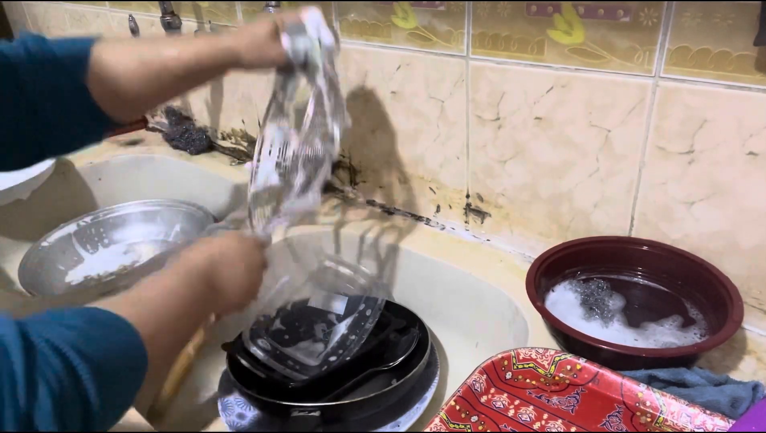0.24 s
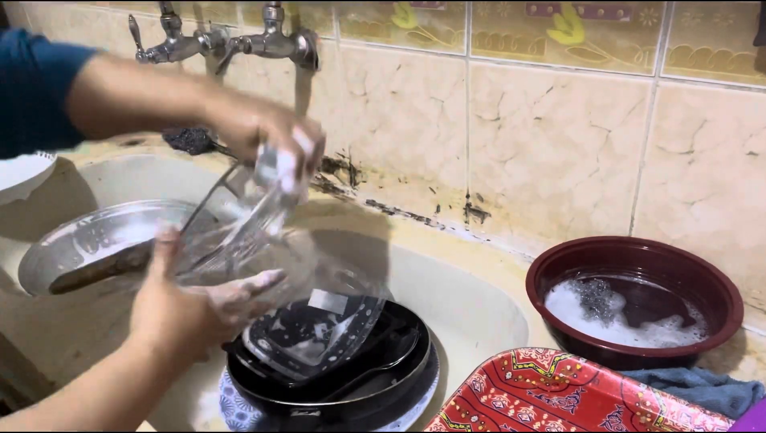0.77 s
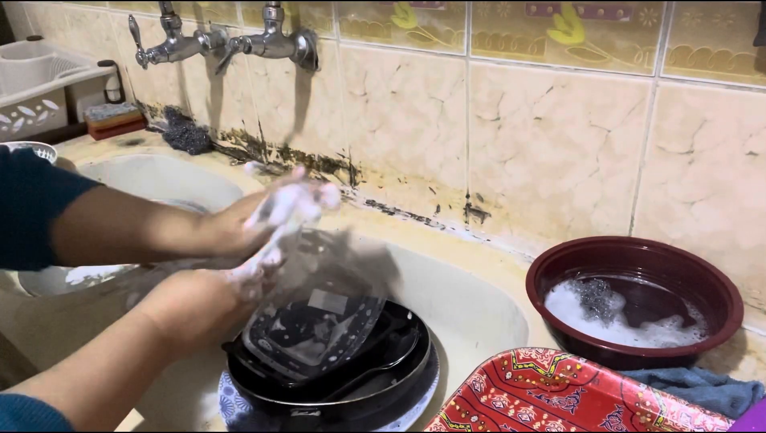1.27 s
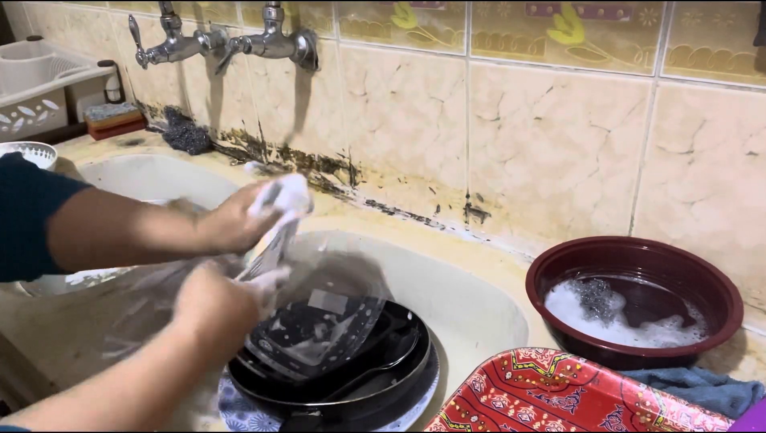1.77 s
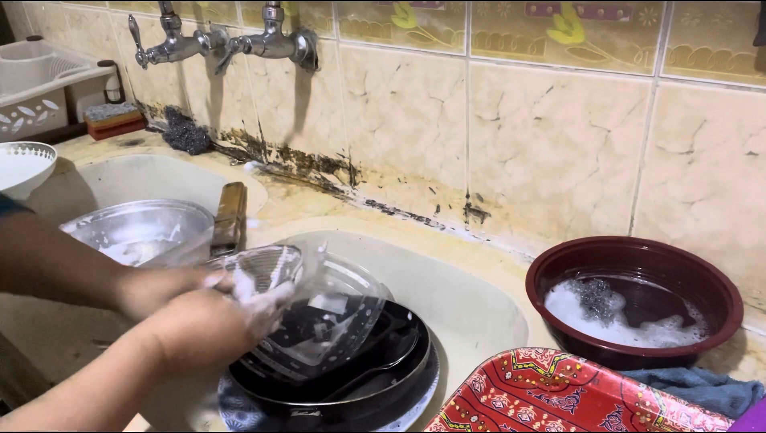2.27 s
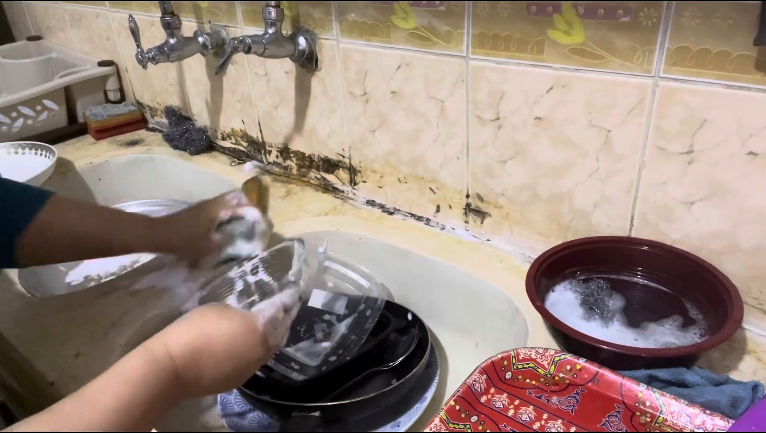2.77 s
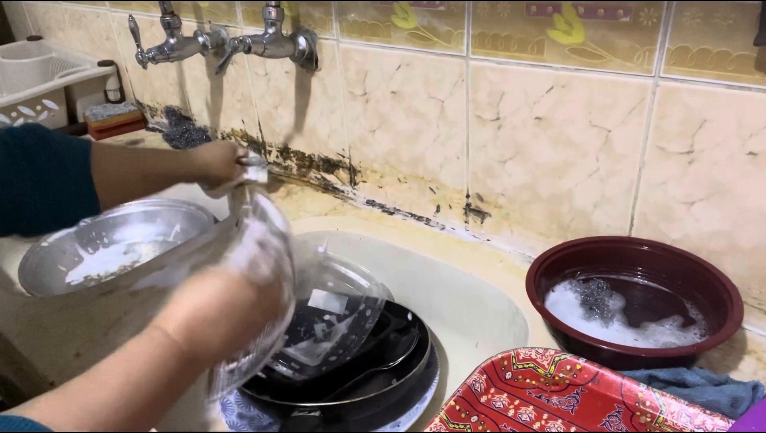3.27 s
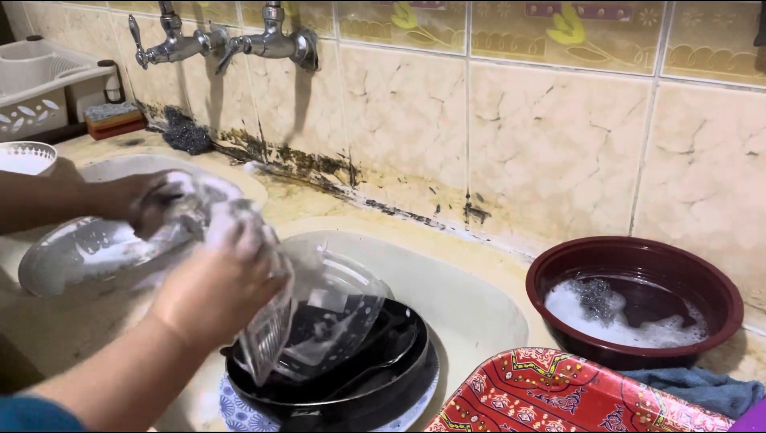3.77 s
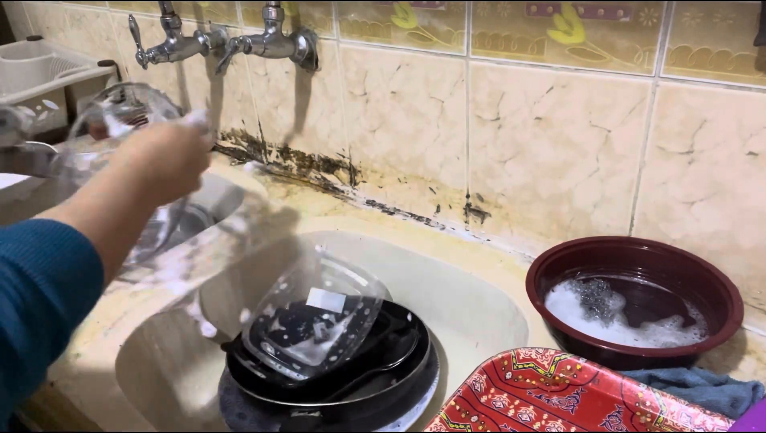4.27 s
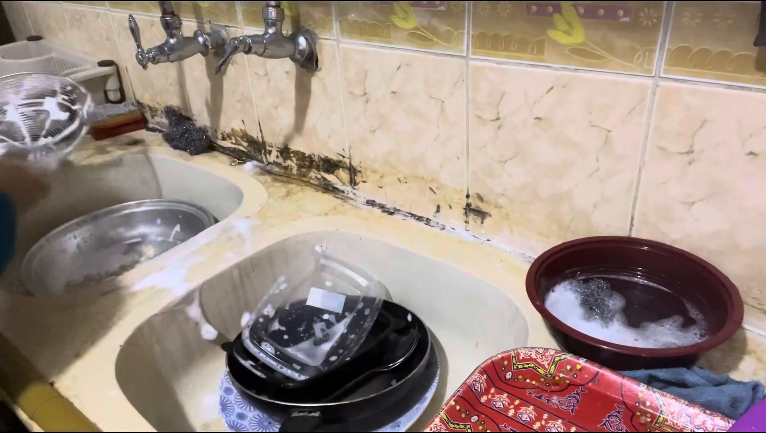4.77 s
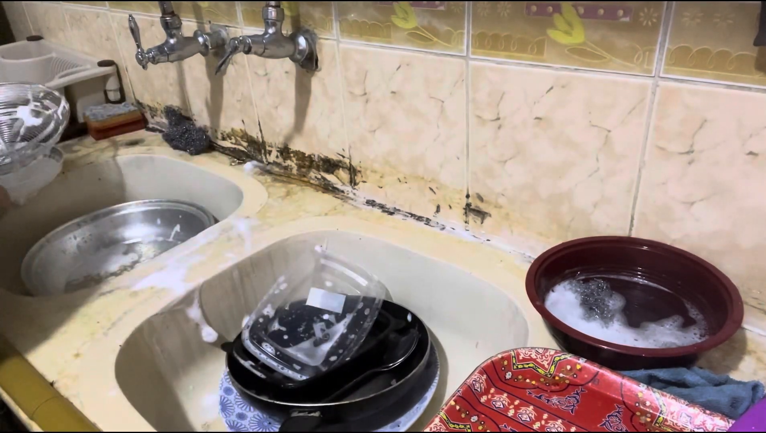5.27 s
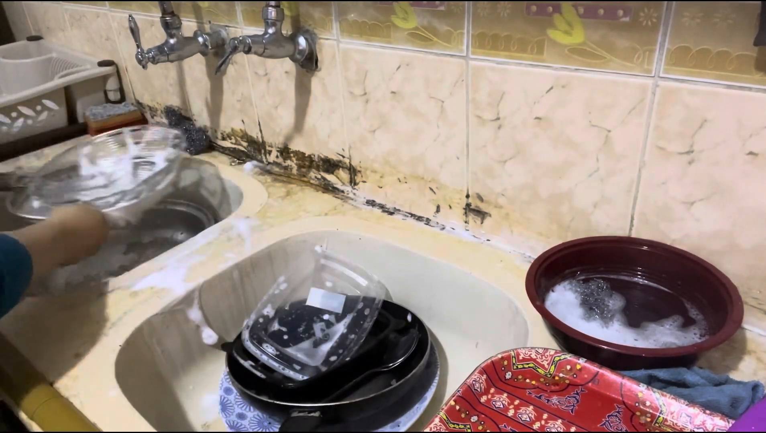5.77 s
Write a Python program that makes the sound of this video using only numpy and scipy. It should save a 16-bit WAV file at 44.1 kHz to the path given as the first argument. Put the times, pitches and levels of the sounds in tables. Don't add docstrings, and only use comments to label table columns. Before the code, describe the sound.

Hands scrub a soapy strainer in a small, hard, echoing kitchen. It starts nearly silent, then uneven knocks on plastic and wire mesh come in bursts, with gritty sponge strokes, sudsy hiss, low sink thuds and chattering dishes between them. Things fall quiet, leaving the low hum; then a faint hollow metal rub, small rim clinks and a final thin metallic clang, all heard close in stereo.

```python
import sys
import numpy as np
from scipy import signal
from scipy.fft import rfft, irfft, next_fast_len
from scipy.io import wavfile

SR = 44100
rng = np.random.default_rng(int(sys.argv[2]) if len(sys.argv) > 2 else 0)


def unload_wav(signal):
    wavfile.write(
        sys.argv[1],
        SR,
        np.round(np.clip(np.atleast_2d(signal).T, -1, 1) * 32767).astype(np.int16),
    )


def boost_factor(decibels):
    exponent = np.asarray(decibels, float) / 20
    return 10 ** exponent


N = 265482

# (frequency [Hz], level [dB per Hz])
HUM_SPECTRUM = [(15, -57), (25, -14.5), (80, 4.5), (123, -4), (190, -31.5), (223, -13), (242, -14),
                (285, -16.5), (463, -34.5), (531, -31), (796, -32.5), (887, -30.5), (1160, -50.5),
                (1260, -40), (16000, -66)]
HUM_DB = -44.5
# (time [s], level [dB])
RUMBLE = [(0.0, -52), (0.2, -48), (0.64, -53), (1.3, -49), (3.5, -52), (3.75, -47), (4.36, -54), (5.0, -52),
          (5.4, -50), (6.02, -54)]
SHAKE_DB, SHAKE_RISE_S, SHAKE_FALL_S = -19, .03, .18
SHAKE_DB_PER_OCTAVE = -10

# (time [s], body peak [dB], ring [Hz], click [dB])
TAPS = [(0.089, -54.5, 624, -54), (0.876, -39, 720, -43), (0.9654, -32, 1190, -55.5),
        (1.009, -51, 680, -48), (1.146, -26.5, 776, -40), (1.351, -25.5, 753, -40.5),
        (1.456, -38, 660, -52), (1.541, -27, 570, -46), (1.617, -22, 700, -41), (2.109, -64, 700, -38),
        (2.145, -31, 680, -38), (2.965, -21.5, 1420, -45), (2.988, -23, 1240, -45),
        (3.339, -33, 1190, -44.5), (3.376, -30.5, 680, -54), (3.434, -37, 633, -36),
        (3.456, -33.5, 1312, -47), (3.48, -32.5, 1390, -48), (3.972, -59, 830, -75), (4.228, -52, 552, -57),
        (4.978, -48, 862, -74)]
# (time [s], body peak [dB], ring [Hz], click [dB], crack [dB])
BLOWS = [(0.722, -13.5, 680, -28, -22.5), (1.762, -19.5, 1650, -18, -18), (1.794, -7.5, 1080, -16, -24),
         (1.9428, -15.5, 1390, -22, -33), (2.5145, -35, 2140, -30, -30.5), (2.536, -8, 1330, -9, -30),
         (2.559, -20.5, 700, -20.5, -42.5), (2.649, -28, 594, -39, -30), (2.721, -28, 580, -24, -35),
         (3.098, -21.5, 1240, -22, -24.5), (3.238, -17, 1730, -14, -19), (3.259, -22, 1730, -27, -35),
         (3.687, -8.5, 700, -13, -13), (3.699, -12, 1090, -13, -14.5), (3.721, -17, 887, -22, -25),
         (3.7385, -26, 800, -24, -24), (3.749, -21, 786, -18, -17)]
# (time [s], body peak [dB], ring [Hz], click [dB])
SKIDS = [(0.769, -22.5, 700, -47), (1.489, -31, 616, -37), (1.738, -54, 640, -31.5),
         (2.2021, -32, 1355, -42.5), (2.344, -33.5, 684, -42), (2.777, -29.5, 593, -38),
         (2.946, -33, 590, -46)]
BLOW_RATTLE_S, TAP_RATTLE_S, SKID_RATTLE_S = .009, .013, .035
TAP_CRACK_DB, SKID_CRACK_DB = -13, -9
BOUNCE_WITHIN_S, BOUNCE_RATTLE_S = .04, .017
# (frequency [Hz], width [Hz], level [dB])
TUB_MODES = [(713, 30, -15), (853, 166, 19.5), (1150, 130, 25.5), (1190, 76, 7), (1390, 57, 2.5),
             (1650, 100, 11), (1950, 50, -3)]
# (frequency [Hz], width [Hz], level [dB])
MESH_MODES = [(2450, 300, -2), (2900, 300, -2), (3350, 280, 0), (3800, 350, -3), (4400, 400, -4),
              (5300, 500, -5)]
# (frequency [Hz], level [dB per Hz])
CRACK_SPECTRUM = [(1180, -35), (2000, -5), (2400, 12.5), (3430, 15), (5210, 9.5), (6940, 18.5), (8400, 3.5),
                  (12300, 14.5), (16000, -18)]
# (until [s], frequency [Hz], T60 [s], share [1])
DISH_UNDER = [
    (1.7, 665, .12, .35),
    (3.6, 1340, .16, .25),
    (6.1, 800, .12, .15),
]

# (time of peak [s], rasp [dB], rise by 10 dB [s], fall by 10 dB [s])
STROKES = [(0.16, -63.5, .05, .04), (0.47, -64, .2, .15), (0.63, -64, .15, .04), (0.77, -54, .02, .15),
           (1.04, -58, .04, .04), (1.1, -54, .04, .1), (1.27, -50, .12, .03), (1.4, -53, .07, .03),
           (1.53, -47, .07, .055), (1.72, -59, .1, .03), (1.84, -46, .03, .13), (1.97, -50, .03, .12),
           (2.12, -52, .04, .06), (2.25, -49, .09, .15), (2.37, -50, .1, .07), (2.655, -45, .07, .04),
           (2.81, -49, .1, .07), (2.97, -50, .06, .05), (3.09, -54, .05, .05), (3.28, -47, .03, .07),
           (3.46, -48, .05, .11), (4.17, -65.5, .4, .15), (4.62, -71, .12, .12), (4.95, -76, .15, .09)]
# (time [s], level [dB])
EFFORT = [(0.0, -58), (0.6, -56.5), (0.89, -49), (1.22, -47), (1.36, -49), (1.68, -42), (1.83, -43),
          (1.94, -39), (2.05, -45), (2.31, -41), (2.47, -48), (2.6, -42), (2.9, -48), (3.02, -42),
          (3.2, -47), (3.36, -42), (3.62, -54), (4.2, -59.5)]
# (frequency [Hz], level [dB per Hz])
RASP_SPECTRUM = [(100, -3.5), (140, 3), (300, -3.5), (500, 0.5), (800, 1.5), (1400, -5), (3200, -7),
                 (5000, -5.5), (8000, -13), (12500, -21.5), (16000, -19)]
RUB_DB, RUB_FOLLOWS, RUB_BY_STROKE_DB = -61, 1.4, -3
WET_DB, WET_FOLLOWS = -76, 1.25
FIZZ_DB = -6
SPRAY_DB, SPRAY_FALL_S = -25, .075
DISH_HUM_DB = -10
# (time [s], level [dB], rise by 10 dB [s], fall by 10 dB [s])
SQUIRTS = [(0.73, -53, .004, .06), (1.76, -46, .016, .03), (1.8, -51, .01, .05), (2.3, -60, .06, .06),
           (2.54, -50, .003, .03), (2.653, -50, .004, .012), (3.7, -46, .008, .05), (5.503, -56, .003, .03),
           (5.7, -56, .003, .02)]

# (time [s], peak [dB], pitch [Hz], rattle [s])
THUDS = [(0.723, -18, 203, 0.023), (0.768, -24, 197, 0.037), (1.252, -29, 390, 0.023),
         (1.355, -33.5, 226, 0.012), (1.489, -30, 356, 0.012), (1.545, -24.5, 385, 0.0064),
         (1.616, -28, 396, 0.045), (1.794, -12.5, 424, 0.019), (1.945, -24, 270, 0.032),
         (2.149, -29.5, 344, 0.017), (2.203, -27, 430, 0.045), (2.342, -34, 450, 0.011),
         (2.537, -15.5, 410, 0.023), (2.648, -31, 434, 0.016), (2.727, -23.5, 186, 0.028),
         (2.78, -28.5, 152, 0.033), (2.949, -26.5, 214, 0.036), (2.989, -29, 200, 0.0085),
         (3.105, -26, 149, 0.023), (3.264, -27, 209, 0.019), (3.336, -29, 420, 0.03),
         (3.375, -21, 280, 0.012), (3.4, -20.5, 400, 0.016), (3.475, -27.5, 272, 0.021),
         (3.683, -33, 549, 0.0077), (3.71, -34, 514, 0.03), (3.782, -25, 355, 0.03),
         (3.858, -26, 215, 0.026)]
# (frequency [Hz], width [Hz], level [dB])
SINK_MODES = [(139, 60, 0), (186.5, 74, -1.5), (280, 36, -1), (355, 44, 1), (412, 44, 0), (518, 45, -9)]

# (time [s], level [dB], centre [Hz], rise by 10 dB [s], fall by 10 dB [s])
RATTLES = [(0.74, -44, 1200, .008, .05), (1.757, -36, 3500, .012, .015), (1.82, -38, 1300, .01, .06),
           (1.97, -37, 780, .01, .06), (2.56, -40, 3000, .01, .05), (2.61, -43, 2800, .03, .05),
           (2.75, -42, 750, .015, .06), (2.97, -44, 1800, .02, .04), (3.11, -42, 1800, .01, .04),
           (3.265, -38, 2300, .01, .06), (3.33, -44, 1600, .03, .04), (3.48, -48, 1500, .04, .05),
           (3.72, -39, 1000, .02, .05), (3.79, -40, 900, .03, .07), (5.93, -40, 1000, .015, .05)]
RATTLE_PER_S, RATTLE_CYCLES, RATTLE_OCTAVES = 600, 11.0, .55

# (time [s], hollow rub [dB], rim squeak [dB])
NUDGE = [
    (5.1, -77.5, -101.5),
    (5.13, -60.5, -90),
    (5.18, -56.5, -80),
    (5.215, -42, -64),
    (5.25, -54.5, -83),
    (5.33, -64.5, -89.5),
    (5.4, -99, -99),
]
# (time [s], level [dB], rise by 10 dB [s], fall by 10 dB [s])
WHINE = [(5.125, -77, .012, .05), (5.175, -73, .04, .02)]
SQUEAK_HZ, SQUEAK_T60_S = 4210, .2
# (frequency [Hz], width [Hz], level [dB])
BASIN_HOLLOW_MODES = [(280, 8.6, -4), (497, 35, -9), (574, 48, -9), (650, 59, -7.5), (860, 52, -3.5),
                      (999, 15, -12.5), (1205, 14, -16.5)]
# (frequency [Hz], width [Hz], level [dB])
RIM_MODES = [(2740, 47, -7), (4230, 31, 0), (4500, 40, -4), (6160, 60, -7), (8600, 53, -15),
             (11400, 120, -16)]

# (time [s], peak [dB], thud [dB], crack [dB], contact [s])
CLINKS = [
    (5.4992, -31, -50, -25.5, 0.013),
    (5.6113, -39, -66, -27, 0.0042),
    (5.698, -41, -54, -28.5, 0.0039),
    (5.902, -11.5, -29, -13, 0.0054),
]
# (frequency [Hz], width [Hz], level [dB])
RIM_TAP_MODES = [(1300, 90, -9), (1700, 50, 0), (1895, 70, -5), (2230, 70, -11), (2750, 40, -5),
                 (3650, 80, -6), (4740, 60, -4), (5570, 55, 0), (6750, 70, -6), (7200, 80, -10),
                 (7650, 70, -10), (8430, 50, -8), (9310, 40, -7), (11400, 80, -7)]
# (frequency [Hz], width [Hz], level [dB])
CLANG_MODES = [(1400, 60, -12), (1630, 90, -3), (2120, 45, 0), (2200, 110, -3), (2830, 45, -6),
               (3750, 110, -5), (4200, 60, -4), (4750, 70, -10), (5580, 70, -4), (5910, 60, -9),
               (6700, 50, -14), (8400, 90, -13), (9320, 80, -11), (11450, 100, -14)]

# (frequency [Hz], T60 [s])
ROOM_T60 = [(150, 0.31), (1000, 0.58), (4000, 0.41), (14000, 0.14)]
ROOM_DB, SCATTER_S = -2.5, .025
ROOM_SHIFT_S = .3
# (frequency [Hz], diffuse part [dB], quarter-cycle lead [1], extra lead of sharp blows [1], lean to the left [1])
PORTS = [(60, -18, .01, .01, -.02), (130, -15, .01, .01, -.04), (250, -11, .01, .01, .02),
         (600, -2, -.1, .01, .01), (1200, -5, -.1, .01, .01), (2500, -3, .1, .01, -.15),
         (4500, 1, .3, .01, -.2), (5500, -.5, .8, .01, -.3), (6900, -3, 1.2, .01, .5),
         (7900, -8, .1, .65, .05), (15000, -8, .1, .7, -.02)]


def rms_one(x):
    return x / np.sqrt(np.mean(x ** 2) + 1e-20)


def peak_one(x):
    return x / (np.abs(x).max() + 1e-20)


def in_time(rows):
    s, *columns = np.transpose(rows)
    return [np.interp(np.arange(N) / SR, s, c) for c in columns]


def at_hz(points, hz):
    points = np.array(points)
    return np.interp(np.log(hz), np.log(points[:, 0]), points[:, 1])


def swells(rows):
    t = np.arange(0, N + 64, 64) / SR
    s, db, rise, fall = np.transpose(rows)[:, :, None]
    power = boost_factor(2 * db - 20 * np.maximum((s - t) / rise, (t - s) / fall)).sum(axis=0)
    return np.interp(np.arange(N) / SR, t, 10 * np.log10(power + 1e-20))


def drift(rate):
    r = np.exp(-80 * np.pi * rate / SR)
    white = rng.standard_normal(N // 40 + 2002)
    slow = rms_one(signal.lfilter([1], [1, -2 * r, r * r], white)[2000:])
    return np.interp(np.arange(N) / 40, np.arange(len(slow)), slow)


def ring(x, hz, t60):
    r = boost_factor(-60 / (max(t60, .002) * SR))
    w = 2 * np.pi * hz / SR
    return signal.lfilter([0, np.sin(w)], [1, -2 * r * np.cos(w), r * r], x + 1e-18)


def band(x, low, high):
    return signal.sosfilt(signal.butter(2, [low, high], "band", fs=SR, output="sos"), x)


def colour(x, spectrum, low, high):
    hz = np.maximum(np.arange(1025) * SR / 2048, 20)
    gain = boost_factor(at_hz(spectrum, hz)) / np.sqrt((1 + (low / hz) ** 6) * (1 + (hz / high) ** 6))
    cepstrum = irfft(np.log(gain + 1e-9))
    cepstrum[1:1024] *= 2
    cepstrum[1025:] = 0
    return signal.fftconvolve(x, irfft(np.exp(rfft(cepstrum))))[:len(x)]


def add(out, sound, s):
    i = round(s * SR)
    out[i:i + len(sound)] += sound[:len(out) - i]


def contact(rattle_s, grit):
    t = np.arange(SR // 3) / SR
    chatter = rng.standard_normal(len(t)) * rng.exponential(1, len(t)) * np.exp(-t / max(rattle_s, .0005))
    chatter *= grit
    chatter[0] = 1
    return chatter


def body(force, peaks, spread_db, damping):
    luck = rng.normal(0, 1, len(peaks))
    return sum(boost_factor(level_db + spread_db * k) * ring(force, hz, 3.2 / (width * damping))
               for (hz, width, level_db), k in zip(peaks, luck))


def household():
    edges = 40 * 2 ** np.arange(0, 8.8, 1 / 3)
    white = rng.standard_normal((2, 2, N))
    shaken = swells([(s, db + SHAKE_DB + SHAKE_DB_PER_OCTAVE * np.log2(hz / 200), SHAKE_RISE_S, SHAKE_FALL_S)
                     for s, db, hz, _ in THUDS])
    stir_db = 10 * np.log10(boost_factor(2 * in_time(RUMBLE)[0]) + boost_factor(2 * shaken))
    stir_db = stir_db - np.median(stir_db) - 2.0
    out = 0
    for k, (low, high) in enumerate(zip(edges, edges[1:])):
        hz = np.sqrt(low * high)
        out = out + boost_factor(at_hz(HUM_SPECTRUM, hz) + stir_db * (hz < 120)) * band(white[k % 2], low, high)
    return boost_factor(HUM_DB) * rms_one(out)


def contacts():
    gaps = np.diff([0] + [row[0] for row in BLOWS])
    blows = [(*row, BOUNCE_RATTLE_S if gap < BOUNCE_WITHIN_S else BLOW_RATTLE_S)
             for row, gap in zip(BLOWS, gaps)]
    taps = [(*row, row[3] + TAP_CRACK_DB, TAP_RATTLE_S) for row in TAPS]
    skids = [(*row, row[3] + SKID_CRACK_DB, SKID_RATTLE_S) for row in SKIDS]
    return blows + taps + skids


def knocks():
    out = np.zeros(N)
    for s, body_db, ring_hz, click_db, crack_db, rattle_s in contacts():
        force = contact(rattle_s, grit=.048)
        hollow = peak_one(ring(force, ring_hz, 18.0 / ring_hz))
        hollow += 0.72 * peak_one(body(force, TUB_MODES, 6.6, 1.66))
        hollow += 0.6 * peak_one(band(force, 450, 2000))
        under_hz, t60, share = next(row[1:] for row in DISH_UNDER if s < row[0])
        dish = ring(force, under_hz, t60) + ring(force, 1.16 * under_hz, 0.58 * t60)
        hollow = band(hollow + share * peak_one(dish), 280, 6700)
        splash = contact(0.76 * rattle_s, grit=0.16)
        click = peak_one(body(splash, MESH_MODES, 2.5, 1.44)) + 0.33 * peak_one(band(splash, 1470, 4500))
        crack = colour(contact(0.3 * rattle_s, grit=0.55), CRACK_SPECTRUM, 4800, 26000)
        knock = boost_factor(body_db) * peak_one(hollow) + boost_factor(click_db) * peak_one(click)
        add(out, knock + boost_factor(crack_db) * peak_one(crack), s)
    return out


def scrubbing():
    thump_db, = in_time(EFFORT)
    swing_db = thump_db - thump_db.mean()
    stroke = boost_factor(swells(STROKES)) + boost_factor(WET_DB + WET_FOLLOWS * swing_db)
    spray = boost_factor(swells([(s, crack_db + SPRAY_DB, .003, SPRAY_FALL_S) for s, *_, crack_db in BLOWS]))
    pressure = boost_factor(RUB_DB + RUB_FOLLOWS * swing_db) + boost_factor(RUB_BY_STROKE_DB) * stroke
    grip = drift(5.1)
    sizes = boost_factor(3.43 * np.minimum(rng.exponential(1, (2, N)), 5)) * rng.choice([-1, 1], (2, N))
    slips, bursts = sizes * (rng.random((2, N)) < np.array([[1500.], [7000.]]) / SR)
    thump = rms_one(colour(slips, RASP_SPECTRUM, 140, 434)) + .5 * rms_one(body(slips, SINK_MODES, 0.83, 0.4))
    rub = rms_one(colour(slips, RASP_SPECTRUM, 407, 2200)) + 0.34 * rms_one(body(slips, TUB_MODES, 1.4, 0.4))
    until, hz, t60, _ = DISH_UNDER[0]
    present = np.interp(np.arange(N) / SR, [.65, .75, until, until + .1], [0, 1, 1, 0])
    force = slips * present * boost_factor(3.0 * drift(9.0))
    dish = ring(force, hz, .55 * t60) + .6 * ring(force, 1.16 * hz, .45 * t60)
    rub += boost_factor(DISH_HUM_DB) * rms_one(dish)
    rasp = rms_one(colour(slips + bursts, RASP_SPECTRUM, 2050, 6800))
    fizz = rms_one(colour(bursts, RASP_SPECTRUM, 6600, 15000))
    mix = boost_factor(thump_db - 2.5 + 2.5 * drift(17.0)) * thump + boost_factor(-4.0) * pressure * rub
    mix += boost_factor(swells(SQUIRTS)) * rms_one(band(bursts, 9000, 15500))
    mix += .9 * (stroke + spray) * rasp
    mix += (boost_factor(FIZZ_DB) * stroke + .75 * spray) * boost_factor(3.5) * fizz
    return boost_factor(1.1 * grip) * mix


def thuds():
    out = np.zeros(N)
    for s, peak_db, thud_hz, rattle_s in THUDS:
        force = band(contact(rattle_s, grit=0.07), 135, 710)
        bump = peak_one(ring(force, thud_hz, 12.0 / thud_hz)) + .6 * peak_one(body(force, SINK_MODES, 4.0, 1.4))
        add(out, boost_factor(peak_db) * peak_one(bump), s)
    return out


def rattles():
    pitches = np.geomspace(400, 6500, 28)
    sizes = boost_factor(4.0 * np.minimum(rng.exponential(1, N), 4)) * rng.choice([-1, 1], N)
    ticks = sizes * (rng.random(N) < RATTLE_PER_S / SR)
    dealt = rng.integers(0, 7, N)
    out = 0
    for k, hz in enumerate(pitches):
        near = [(s, db - 10 * (np.log2(hz / centre_hz) / RATTLE_OCTAVES) ** 2, rise, fall)
                for s, db, centre_hz, rise, fall in RATTLES]
        force = ticks * (dealt == k % 7)
        t60 = RATTLE_CYCLES / hz
        out = out + ring(force * boost_factor(swells(near)), hz, t60) / ring(force, hz, t60).std()
    return .5 * out


def nudge():
    rub_db, squeak_db = in_time(NUDGE)
    friction = rng.standard_normal(N) * rng.exponential(1, N)
    rub = boost_factor(rub_db) * rms_one(body(friction, BASIN_HOLLOW_MODES, .1, 2.0))
    rub += boost_factor(swells(WHINE)) * rms_one(ring(friction, SQUEAK_HZ, SQUEAK_T60_S))
    return rub + boost_factor(squeak_db) * rms_one(body(friction, RIM_MODES, 0.093, 1.1))


def basin():
    out = np.zeros(N)
    for s, peak_db, thud_db, crack_db, contact_s in CLINKS:
        force = contact(2.2 * contact_s, grit=0.12)
        peaks = CLANG_MODES if peak_db > -20 else RIM_TAP_MODES
        modes = body(force, peaks, .9, .8) + body(force, np.array(peaks) * [.99, 1, 1], 1.5, 1.1)
        thud = body(contact(5.7 * contact_s, grit=0.27), BASIN_HOLLOW_MODES, 1.7, 0.57)
        thud = band(thud, 150, 750)
        crack = colour(contact(contact_s, grit=0.268), CRACK_SPECTRUM, 1360, 24000)
        shimmer = rng.standard_normal(len(force)) * np.exp(-np.arange(len(force)) / SR / 0.055)
        shimmer = peak_one(body(shimmer, peaks, 2.0, 5.0)) + 0.9 * peak_one(band(shimmer, 1300, 14000))
        bright = peak_one(crack) + 0.5 * peak_one(shimmer)
        clink = boost_factor(peak_db) * peak_one(modes) + boost_factor(thud_db) * peak_one(thud)
        add(out, clink + boost_factor(crack_db - 5.0) * bright, s)
    return out


def kitchen(x):
    t = np.arange(SR * 2 // 3) / SR
    edges = 70 * 2. ** np.arange(9)
    decay = [boost_factor(-60 * t / max(at_hz(ROOM_T60, 1.4 * low), .05)) for low in edges]
    out, step = np.zeros((N, 2)), int(ROOM_SHIFT_S * SR)
    for i in range(0, N, step):
        white = rng.standard_normal((2, len(t)))
        tails = sum(band(white, low, high) * d for low, high, d in zip(edges, edges[1:], decay))
        tails = tails * (1 - np.exp(-t / 0.0047))
        echoes = signal.fftconvolve(x[None, i:i + step], tails / np.sqrt(SR / 40), axes=1)
        add(out, echoes.T, i / SR)
    return out.T


def scattered(x):
    t = np.arange(SR // 20) / SR
    out, step = np.zeros(N), SR // 25
    for i in range(0, N, step):
        echoes = rng.standard_normal(len(t)) * np.exp(-t / SCATTER_S)
        add(out, signal.fftconvolve(x[i:i + step], echoes / np.linalg.norm(echoes)), i / SR)
    return out


def two_ports(mid, other, blows):
    size = next_fast_len(N + SR // 4)
    hz = np.maximum(np.arange(size // 2 + 1) * SR / size, 1)
    diffuse_db, lead, sharp, lean = (at_hz(np.array(PORTS)[:, [0, k]], hz) for k in (1, 2, 3, 4))
    side = boost_factor(diffuse_db) * rfft(other, size)
    side += (lean + 1j * lead) * rfft(mid, size) + 1j * sharp * rfft(blows, size)
    side = irfft(side, size)[:N]
    return np.array([mid + side, mid - side])


def scene():
    blows = knocks() + basin()
    near = blows + thuds() + scrubbing() + nudge()
    far = boost_factor(ROOM_DB) * kitchen(near) + household()
    near = near + rattles()
    return two_ports(near + far[0], scattered(near) + far[1], blows)


def roll_off(x):
    return signal.sosfilt(signal.butter(12, 15900, fs=SR, output="sos"), x)


def record(dry):
    low_cut = signal.sosfilt(signal.butter(3, 42, "high", fs=SR, output="sos"), dry)
    mix = signal.sosfilt(signal.cheby2(12, 50, 16300, fs=SR, output="sos"), low_cut)
    return roll_off(mix)


dry = scene()
out = record(dry)
unload_wav(out)
```